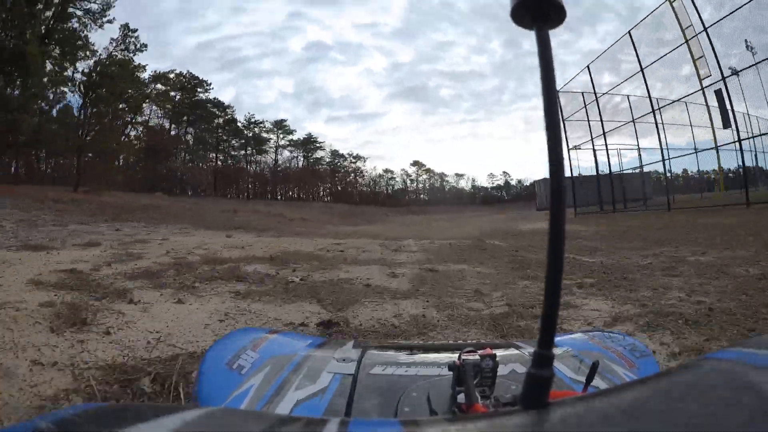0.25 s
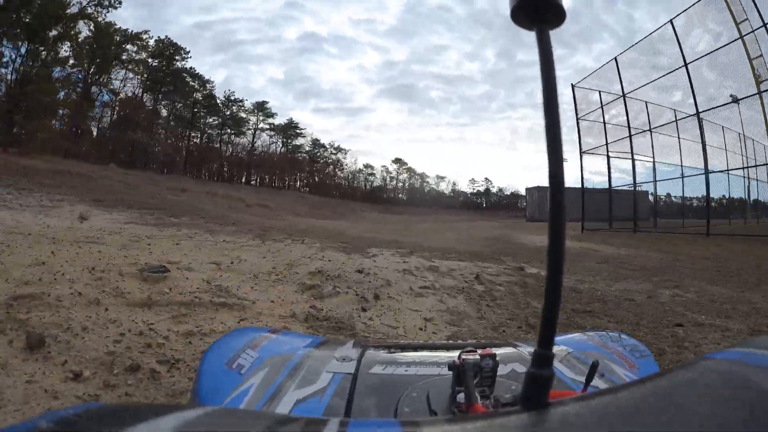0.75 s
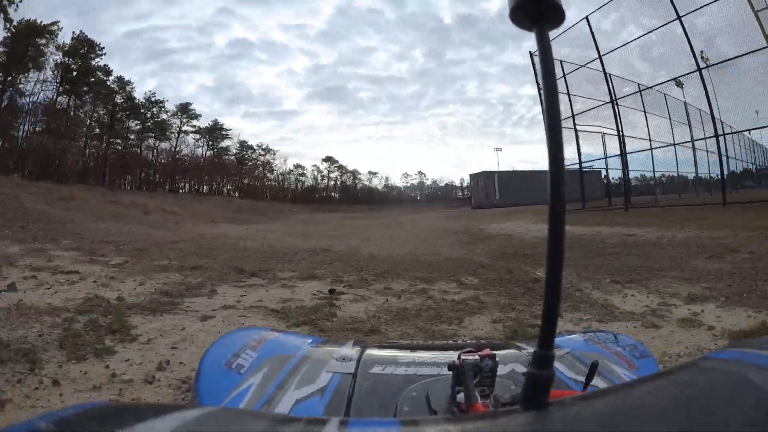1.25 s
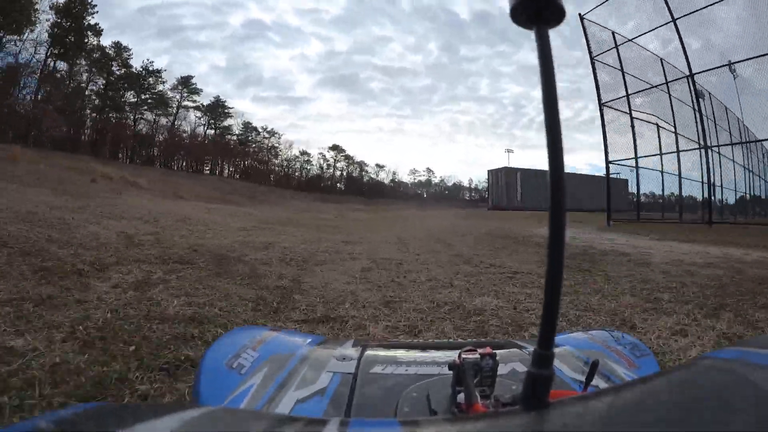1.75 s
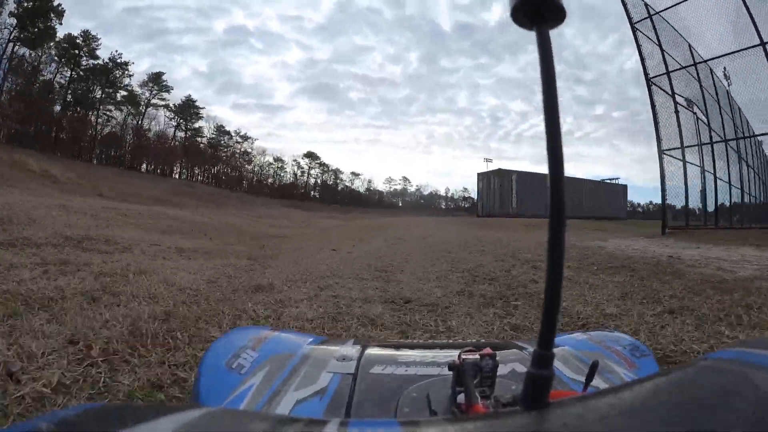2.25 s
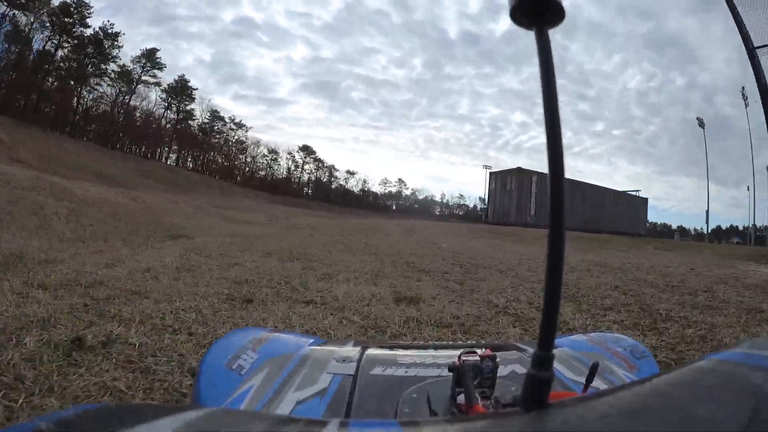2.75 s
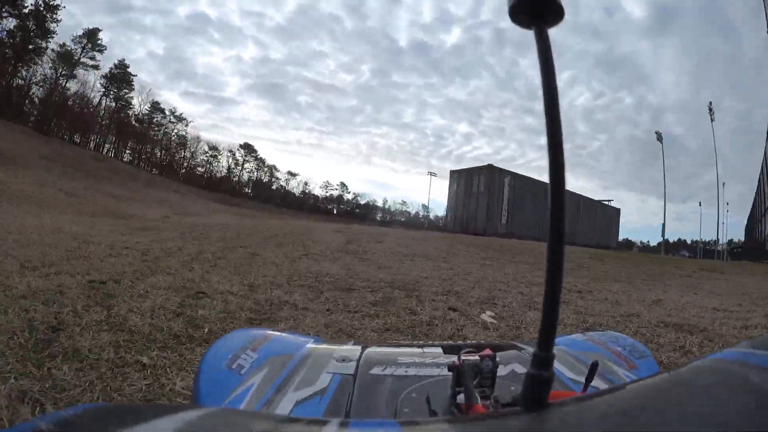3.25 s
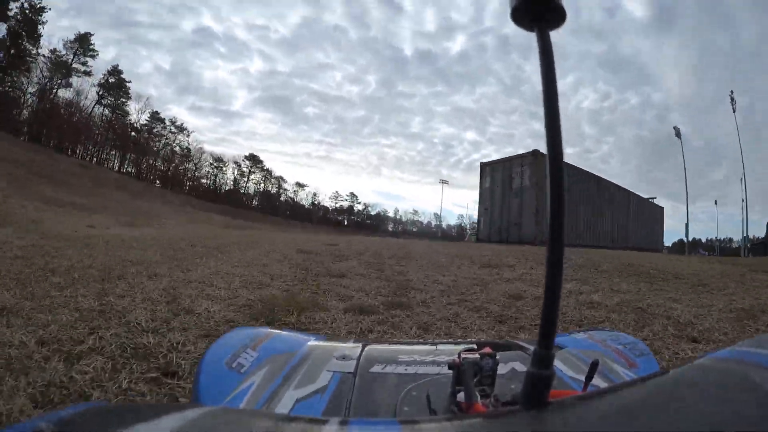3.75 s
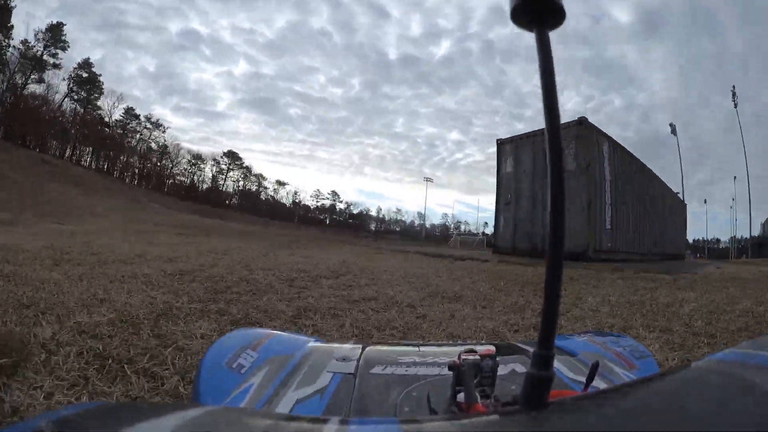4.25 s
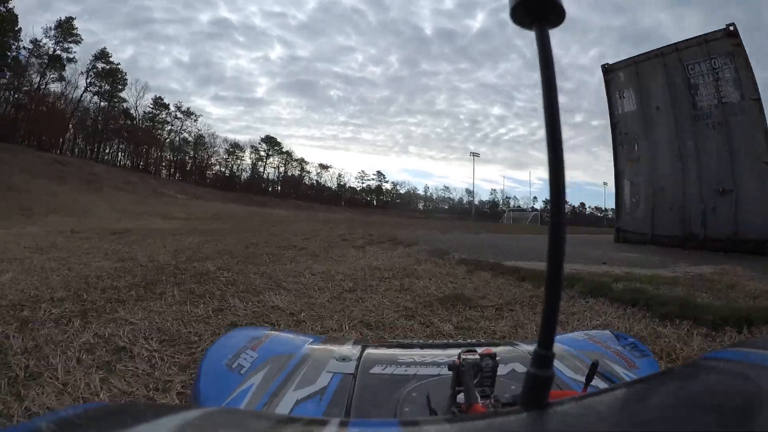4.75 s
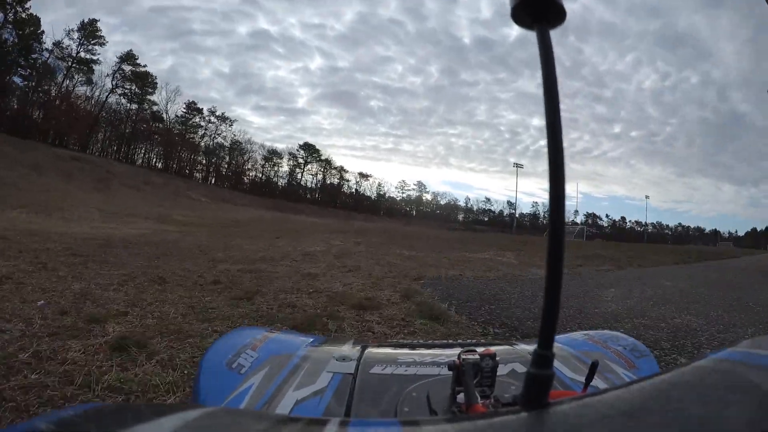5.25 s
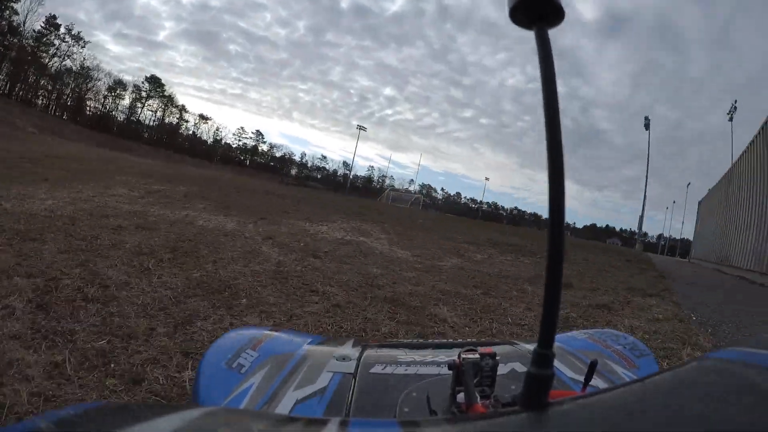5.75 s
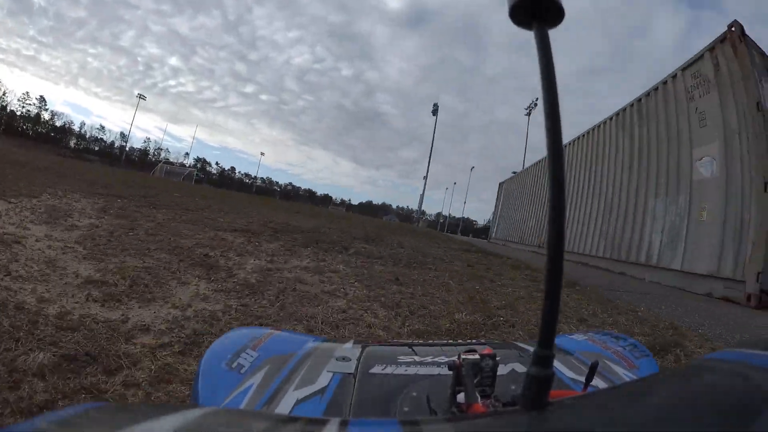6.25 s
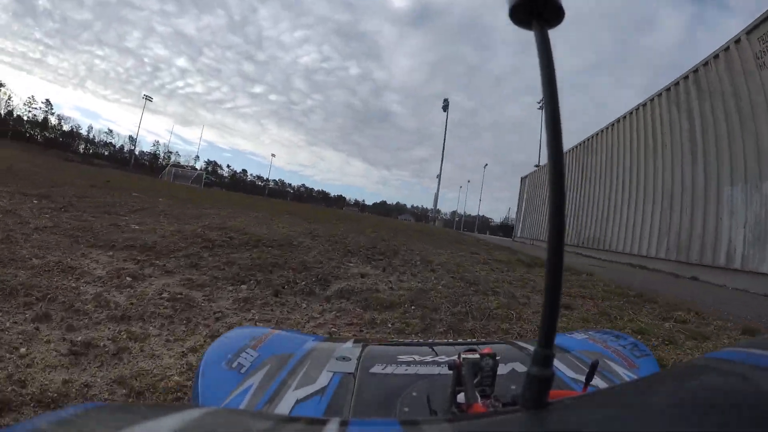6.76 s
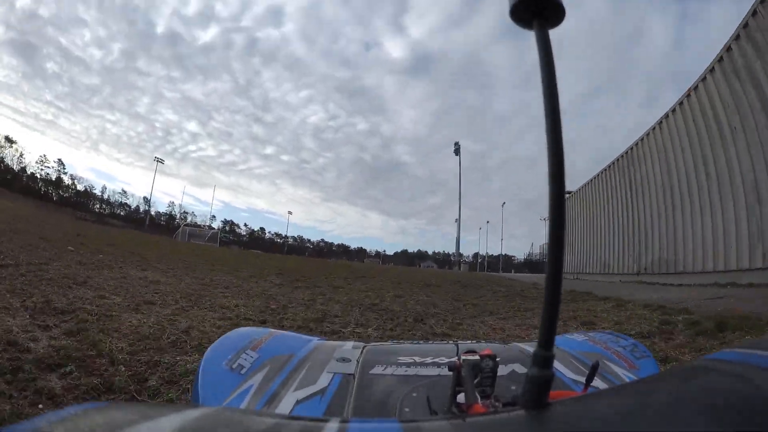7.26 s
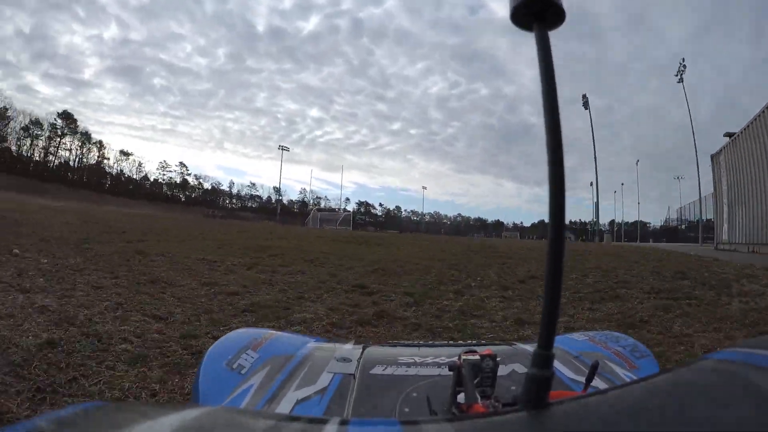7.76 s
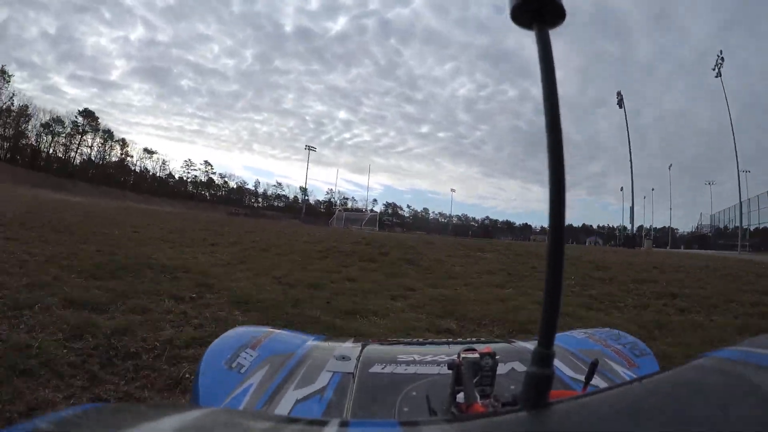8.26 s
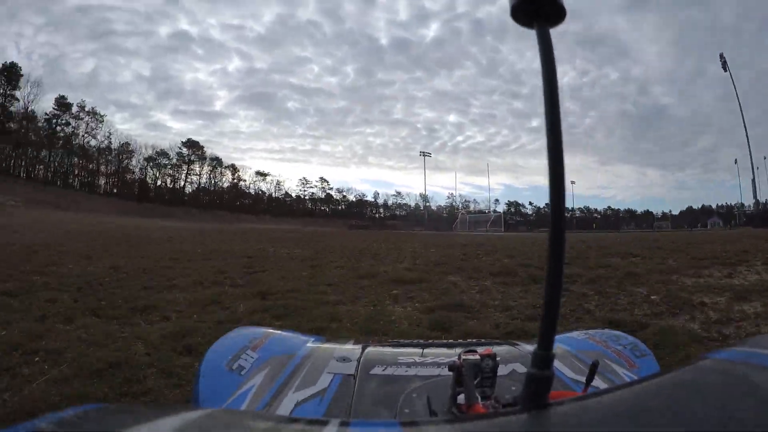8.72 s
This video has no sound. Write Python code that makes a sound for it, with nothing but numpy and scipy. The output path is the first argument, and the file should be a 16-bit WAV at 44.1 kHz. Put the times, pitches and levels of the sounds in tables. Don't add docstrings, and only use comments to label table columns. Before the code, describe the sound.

A body-mounted camera microphone catches a small electric truck crossing an open field. Dry, gritty shaking and mid-range plastic clatter dominate, with a thin whine beneath. Bumps crack at uneven moments, stones ring a panel for an instant, and a loose metal clip chinks very high. The roughest jolts come past the middle; afterwards the ground softens, the wheels spin with a quick rising whine, and bumpy running continues.

```python
import sys
import numpy as np
from scipy import signal
from scipy.fft import rfft, irfft, next_fast_len
from scipy.io import wavfile
from scipy.ndimage import uniform_filter1d, minimum_filter1d, map_coordinates

SR = 44100
rng = np.random.default_rng(int(sys.argv[2]) if len(sys.argv) > 2 else 0)


def gain_from_db(level_db):
    decades = np.asarray(level_db, float) / 20
    return 10 ** decades


def persist_wave(psi):
    counts = np.round(np.clip(psi, -1, 1) * 32767).astype(np.int16)
    wavfile.write(sys.argv[1], SR, np.atleast_2d(counts).T)


N = 396459


def unit(x):
    return x / np.sqrt(np.mean(x ** 2) + 1e-20)


def curves(rows):
    s, *cols = np.transpose(rows)
    return [np.interp(np.arange(N) / SR, s, c) for c in cols]


def wobble(rate):
    knots = rng.standard_normal(int(N * rate / SR) + 4)
    return map_coordinates(knots, [np.arange(N) * rate / SR])


def filtered(x, response):
    m = next_fast_len(N + SR // 4)
    return irfft(rfft(x, m) * response(np.fft.rfftfreq(m, 1 / SR)), m)[..., :N]


def band(x, lo_hz, hi_hz):
    return signal.sosfilt(signal.butter(2, [lo_hz, hi_hz], "bandpass", fs=SR, output="sos"), x)


def chassis(pair):
    # pitch_hz, left_db, right_db, left_right_likeness (0-1)
    shell = [(30, -26, -41, 0.6), (59.7, -18, -28, 0.98), (110, -29.5, -30, 0.62), (199.4, -12.5, -34, 0.1),
             (352, -10.5, -16, 0.74), (481.6, 5.5, -6, 0.84), (740, -9, -12, 0.3), (977, -3, -6, 0.67),
             (1417, -16.5, -8.5, 0.14), (1600, -5, -11, 0.81), (2000, -3.5, 0.3, 0.95),
             (2310, -18, -12, 0.5), (2546, -27.5, -4.5, 0.6), (2750, -18, -10.5, 0.47)]
    air = [(3600, -20.5, -13.5, 0.76), (4310, -29, -16, 0.096), (5470, -32.5, -26, 0.53),
           (5640, -32.5, -25.5, .05), (6000, -42, -31, .1), (6400, -34.5, -36, .25),
           (7500, -62, -61.5, .25), (8820, -73, -83, .26), (8630, -44, -40.5, 0.9), (10150, -37, -38, 0.5),
           (11000, -44, -34, .13), (13500, -41.5, -32.5, .21), (15300, -38, -33, .22)]
    # pitch_hz, lead_radians
    lead = [(0, 1.5), (340, -1.77), (1120, -0.63), (1550, -3), (2070, -1.24), (3100, 4), (3700, 5),
            (4310, 9.5), (5430, 11.5), (6630, 13), (7320, 22.5), (8440, 17.5), (8870, 18.5), (15700, 20)]
    # pitch_hz, width_hz, boost_db
    sharp_modes = [(2000, 160, 3.5), (1710, 220, -1.5), (2476, 150, 3.5), (481, 56, 2.5)]
    hz = np.fft.rfftfreq(4096, 1 / SR)
    f, left_db, right_db, alike = np.transpose([*shell, *air])
    on_log = lambda v: np.interp(np.log(hz + 1), np.log(f), v)
    modes_db = sum(db / (1 + (2 * (hz - c) / w) ** 2) for c, w, db in sharp_modes)
    cepstrum = irfft(np.log(gain_from_db([on_log(left_db), on_log(right_db)] + modes_db)))
    cepstrum[:, 1:2048] *= 2
    cepstrum[:, 2049:] = 0
    log_gain = rfft(cepstrum)
    mean_phase = log_gain.imag.mean(axis=0)
    gap = np.interp(hz, *np.transpose(lead)) / 2
    ports = np.exp(log_gain.real + 1j * (mean_phase + [gap, -gap]))
    turn = np.arccos(np.clip(on_log(alike), 0, 1)) / 2
    mix = ports[:, None] * [[np.cos(turn), np.sin(turn)], [np.cos(turn), -np.sin(turn)]]
    response = np.roll(irfft(mix), 256, axis=-1)
    return signal.oaconvolve(pair[None], response, axes=-1).sum(axis=1)[:, 256:N + 256]


def shaking():
    hits = rng.random((2, N)) < 260 / SR
    hit_db = 3 * np.minimum(rng.exponential(size=(2, N)), 1.1)
    grit = hits * rng.standard_normal((2, N)) * gain_from_db(hit_db)
    grit[1] = 0.5 * grit[0] * rng.uniform(-2.23, 1, N) + 0.51 * grit[1]
    grit = filtered(unit(grit), lambda hz: 0.18 + 1.06 / (1 + (hz / 6500) ** 4))
    flutter = gain_from_db(0.16 * wobble(8) + 1.23 * wobble(25) + 2.42 * wobble(60))
    return flutter * (rng.standard_normal((2, N)) + .38 * grit)


def running():
    # time_s, strength_db
    ground = [(0, -23), (.07, -19), (.15, -21.5), (.32, -18), (.35, -23.5), (.47, -21), (4.08, -22),
              (4.18, -23.5), (4.56, -19), (4.66, -29.5), (4.71, -19), (4.78, -27.5), (4.96, -13),
              (5.06, -29.5), (5.53, -17), (5.57, -31.5), (5.68, -21.5), (8.99, -21)]
    # time_s, softness (0-1)
    turf = [
        (0, .4),
        (1.4, 0.02),
        (4.5, .1),
        (5.7, 0.17),
        (6.7, .95),
        (7.3, 0.34),
        (8.99, 0.64),
    ]
    # level_over_strength_db, swing_with_strength (ratio), loss_on_turf_db
    ranges = [
        (1.5, 0.86, 5),
        (2.5, 0.93, 1.5),
        (-8, 0.72, 2),
        (-11, 0.87, 7.5),
    ]
    body = chassis(shaking())
    below = [filtered(body, lambda hz: 1 / (1 + (hz / edge_hz) ** 12)) for edge_hz in (750, 2900, 7700)]
    parts = [below[0], below[1] - below[0], below[2] - below[1], body - below[2]]
    (strength_db,), (soft,) = curves(ground), curves(turf)
    mean_db = strength_db.mean()
    total = 0
    for part, (db, swing, loss_db) in zip(parts, ranges):
        swell_db = swing * (strength_db - mean_db) + 1.03 * wobble(12)
        total = total + unit(part) * gain_from_db(mean_db + db + swell_db - loss_db * soft)
    return total


def tone(hz, clean, width_hz):
    phase = 2 * np.pi * np.cumsum(hz * (1 + 0.0039 * wobble(30))) / SR
    smear = unit(wobble(width_hz)) * np.cos(phase) + unit(wobble(width_hz)) * np.sin(phase)
    share = np.clip(clean, 0, 1)
    return np.sqrt(2 * share) * np.sin(phase) + np.sqrt(1 - share) * smear


def drive():
    # time_s, pitch_hz, level_db
    cruise = [
        (0, 1260, -49),
        (.25, 1275, -30.5),
        (.8, 1300, -31),
        (1.1, 1393, -30.5),
        (2.95, 1455, -31),
        (3.15, 1500, -40),
        (4.4, 1520, -38),
        (4.6, 1454, -35),
        (4.9, 1290, -57),
    ]
    # time_s, pitch_hz, level_db
    spin = [
        (6.15, 1277, -52),
        (6.33, 1286, -26),
        (6.74, 1290, -26),
        (6.9, 1430, -33),
        (7.0, 1597, -32),
        (7.09, 2000, -27),
        (7.16, 2200, -29),
        (7.24, 2240, -25),
        (7.32, 2286, -44),
    ]
    # time_s, pitch_hz, level_db
    mesh = [
        (5.9, 510, -62),
        (6.1, 520, -24),
        (6.85, 575, -25),
        (7.0, 620, -29),
        (7.06, 760, -49),
        (7.13, 900, -28),
        (7.5, 1035, -26),
        (8.2, 1045, -30.5),
        (8.99, 960, -30.5),
    ]
    t = np.arange(N) / SR
    (hz, db), (spin_hz, spin_db) = curves(cruise), curves(spin)
    spinning = t > spin[0][0]
    octave_db = db + 3 - .2 * np.maximum(hz - 1295, 0)
    grip_s, grip_every_s, stutter_db = 7.095, .068, 5.5
    grip = (spin_hz > 1380) * (np.cos(2 * np.pi * (t - grip_s) / grip_every_s) - .3)
    waver, patchy_db = .012, 2
    hz = np.where(spinning, spin_hz, hz) * (1 + waver * np.where(spinning, 1, .4) * wobble(20))
    db = db + patchy_db * wobble(6.98)
    whine = gain_from_db(db) * tone(hz, clean=0, width_hz=70) * gain_from_db([[-8], [3]])
    racing = np.clip((hz - 1850) / 330, 0, 1)
    clean = np.where(spinning & (hz < 1340), .55, .15)
    octave = (1 - racing) * tone(2 * hz, clean=clean, width_hz=120)
    octave = octave + racing * tone(1.92 * hz, clean=0, width_hz=1000)
    fourth = gain_from_db(-15) * (hz > 1320) * (hz < 1480) * tone(4 * hz, clean=.1, width_hz=230)
    octave_db = np.where(spinning, spin_db + stutter_db * grip, octave_db + 1.1 * patchy_db * wobble(16))
    gear_hz, gear_db = curves(mesh)
    gears = gain_from_db(gear_db) * tone(gear_hz, clean=0, width_hz=140) * gain_from_db([[2.5], [-2.5]])
    return whine + gain_from_db(octave_db) * (octave + fourth) * gain_from_db([[-11], [4.5]]) + gears


def blows():
    # start_s, peak_db, gain_duck_db
    hard_bumps = [(0.1067, -7, 6.5), (0.1862, -9, 6.5), (.3316, -9, 4.5), (0.5959, -9, 4.7),
                  (1.4483, -10, 3.5), (1.521, -11.5, 7), (2.0728, -9, 5), (2.4496, -8.4, 3),
                  (2.731, -11.5, 5), (2.9896, -8, 5.5), (4.1456, -11.5, 8), (4.4349, -6, 6),
                  (4.5923, -10, 3), (4.744, -13, 3), (4.8874, -10.5, 8), (5.2975, -9.5, 6.5),
                  (5.3929, -7.5, 6), (5.5048, -11, 4.8), (5.5357, -3.5, 12.5), (5.8565, -9.5, 3.5),
                  (5.935, -10.4, 4.5), (6.0082, -14, 5), (7.4579, -9, 5), (7.7328, -8.5, 1.5),
                  (7.7946, -9.5, 5), (7.888, -8, 5.5), (8.2631, -8.5, 7), (8.4945, -9, 4), (8.6722, -14, 5),
                  (8.8852, -9.5, 6)]
    # start_s, peak_db
    further_knocks = [(0.5277, -12), (.7133, -7.5), (1.0088, -11), (1.297, -9), (1.5816, -8), (2.0405, -9.2),
                      (3.4407, -10.5), (3.6885, -9), (3.8716, -11), (4.075, -9), (4.128, -7.5),
                      (4.3497, -8.9), (4.7934, -10.7), (5.0051, -7.9), (5.041, -6), (5.0844, -10),
                      (5.1352, -7.5), (5.2593, -9.9), (5.3286, -4), (5.7875, -8), (6.1088, -8.5),
                      (6.3068, -13.5), (6.7326, -12), (6.7695, -9), (7.0294, -9.2), (8.1683, -11.5),
                      (8.4044, -11), (8.7296, -8), (8.8429, -7), (8.939, -12.5)]
    pebble_s = [.1618, .3671, 1.6578, 1.7367, 1.8726, 1.9375, 2.12, 2.6436, 3.205, 4.2805, 4.9751, 5.114,
                5.155, 5.2818, 5.4235, 5.6368, 5.751, 5.814, 5.8881, 5.9892, 6.082, 6.8803, 6.957, 7.9385,
                7.9966, 8.3424, 8.3805, 8.5463, 8.7822, 8.8232]
    knocks = [(s, db, 3.5) for s, db in further_knocks]
    pebbles = [(s, -11.5, 0.93) for s in pebble_s]
    return np.transpose([*hard_bumps, *knocks, *pebbles])


def bumps():
    s, db, duck_db = blows()
    chance = rng.random((len(s), 5))
    sharp_db, dull_db = [[-14], [-7.5]] + 6.5 * (2 * chance[:, 3:].T - 1)
    sign, opposed = np.sign(chance[:, 0] - .5), 1.3 * (chance[:, 1] - .5)
    first = np.round(s * SR).astype(int) + 5
    flight = 60 + 120 * chance[:, 2]
    second, third = first + flight.astype(int), first + (1.7 * flight).astype(int)
    where = np.concatenate([first, second, third])
    rebounding = lambda size: np.bincount(where, np.concatenate([size, -.4 * size, .25 * size]), N)[:N]
    train = lambda level: np.array([rebounding(sign * gain_from_db(level)), rebounding(opposed * gain_from_db(level))])
    mid = band(train(db + 36 + .4 * duck_db), 1400, 2900)
    sharp = band(train(db + sharp_db + 39.5), 2900, 6000)
    dull = band(train(db + dull_db + 34), 220, 1100)
    crack = band(train(db + .3 * sharp_db + 31), 6500, 15000)
    return chassis(mid + sharp + dull + crack)


def ducking():
    drop_db, t = np.zeros(N + SR), np.arange(SR // 2) / SR
    for s, _, duck_db in blows().T:
        back_s = 0.01 + 0.0073 * duck_db
        depth_db = (0.89 + 0.016 * duck_db) * duck_db
        shape = (1 - np.exp(-t / 0.0015)) * np.exp(-(t / back_s) ** 2)
        drop_db[round((s + .0025) * SR):][:len(t)] += depth_db * shape
    return gain_from_db(-drop_db[:N])


def stones():
    # start_s, pitch_hz, peak_db, fade_by_60_db_s
    stone_hits = [
        (0.1073, 3300, -17, 0.019),
        (0.264, 3900, -14, 0.0096),
        (4.146, 3620, -8.5, 0.02),
        (4.281, 3600, -15, 0.0089),
        (4.435, 4240, -19.5, 0.0053),
        (5.391, 3000, -16, 0.0073),
        (5.5352, 4530, -6, 0.0079),
        (5.713, 3600, -15, 0.022),
        (6.11, 3000, -14.5, 0.0088),
    ]
    out, t = np.zeros(N), np.arange(1200) / SR
    for s, hz, db, t60 in stone_hits:
        pair = sum(np.sin(2 * np.pi * hz * k * t) for k in (.97, 1.04))
        ring = pair * gain_from_db(-60 * t / t60) * (1 - np.exp(-t / 0.0003))
        crack = gain_from_db(3.2 * (db + 4.0) - 17.5 - 60 * t / 0.0039) * rng.standard_normal(len(t))
        out[round(s * SR):][:len(t)] += gain_from_db(db) * ring + crack
    return out * gain_from_db([[-9], [2]])


def chinks():
    # start_s, peak_db
    clip_hits = [
        (4.689, -31),
        (5.8426, -27),
        (5.909, -20.5),
        (6.0462, -32),
        (6.2083, -26.5),
        (6.2916, -33),
        (8.468, -34.5),
    ]
    out, t = np.zeros(N), np.arange(1500) / SR
    for s, db in clip_hits:
        ring = sum(np.sin(2 * np.pi * hz * rng.normal(1, .012) * t) for hz in (13500, 13900))
        out[round(s * SR):][:len(t)] += gain_from_db(db + 3.0 - 60 * t / 0.028) * (1 - np.exp(-t / .0015)) * ring
    return out * gain_from_db([[-9], [4]])


def levelled(x):
    level_db = 10 * np.log10(np.abs(uniform_filter1d(np.mean(x ** 2, axis=0), size=300)) + 1e-9)
    need_db = -.55 * np.maximum(level_db + 16, 0)
    held_db = minimum_filter1d(need_db, size=700, origin=250)
    return x * gain_from_db(uniform_filter1d(held_db, size=500))


def dropped(x):
    # pitch_hz, left_chance (0-1), right_chance (0-1)
    silences = [(4200, 0, 0), (4700, .12, .01), (5200, .12, .02), (5900, .28, .08), (6150, .6, .6),
                (6700, .55, .55), (7000, .96, .92), (8600, .95, .9), (9100, .4, .4), (10000, .25, .2),
                (11000, .14, .1), (15000, .12, .08), (15450, .5, .5)]
    hz, _, z = signal.stft(x, SR, nperseg=1024)
    f, *chance = np.transpose(silences)
    cells = rng.random((2, len(hz) // 4 + 1, z.shape[2] // 4 + 1))
    cells = cells.repeat(4, axis=1).repeat(4, axis=2)[:, :len(hz), :z.shape[2]]
    local = uniform_filter1d(np.abs(z), size=9, axis=1)
    loud = local > 14 * np.median(local, axis=2, keepdims=True)
    keep = loud | (cells > np.array([np.interp(hz, f, c) for c in chance])[..., None])
    return signal.istft(z * keep, SR, nperseg=1024)[1][:, :N]


def scene():
    ride = levelled(gain_from_db(2.0) * running() + drive())
    return ducking() * (ride + bumps() + stones()) + chinks()


def roll_off(x):
    return signal.sosfilt(signal.butter(12, 16090, fs=SR, output="sos"), x)


def record(dry):
    need = np.minimum(1, 1.08 / (np.abs(dry).max(axis=0) + 1e-9))
    x = dry * uniform_filter1d(minimum_filter1d(need, size=81), size=41)
    x = filtered(np.clip(x, -1, 1), lambda hz: hz < 15450)
    return roll_off(dropped(x))


dry = scene()
out = record(dry)
persist_wave(out)
```